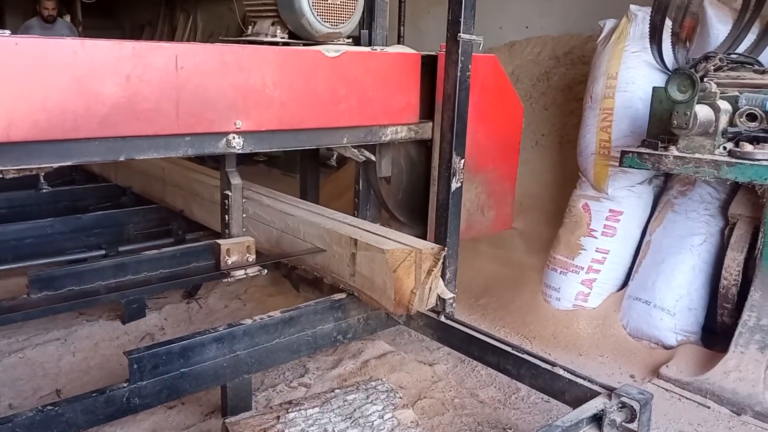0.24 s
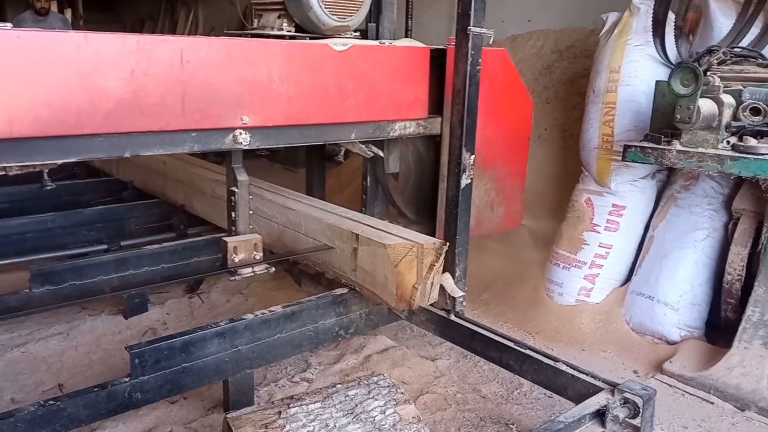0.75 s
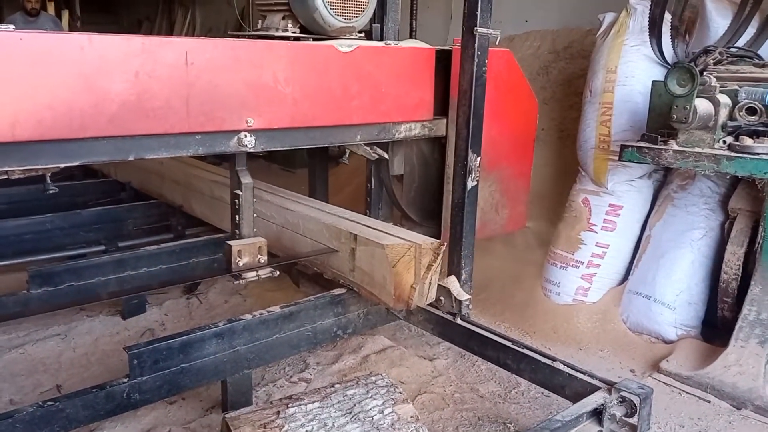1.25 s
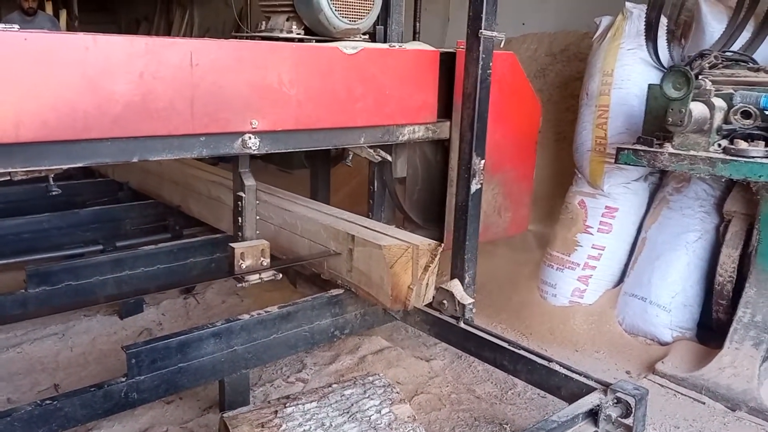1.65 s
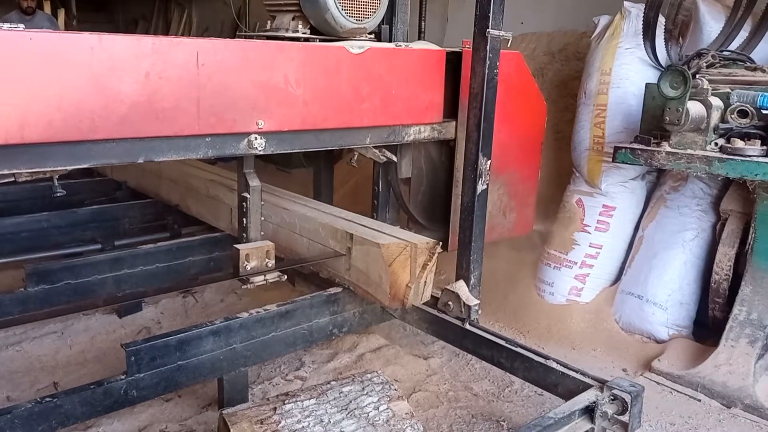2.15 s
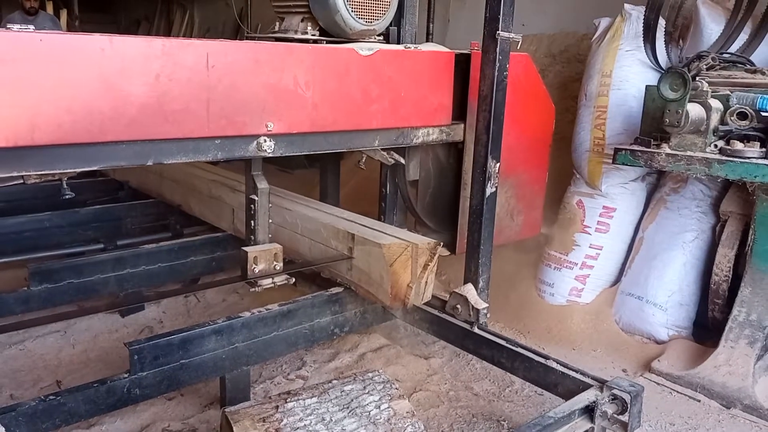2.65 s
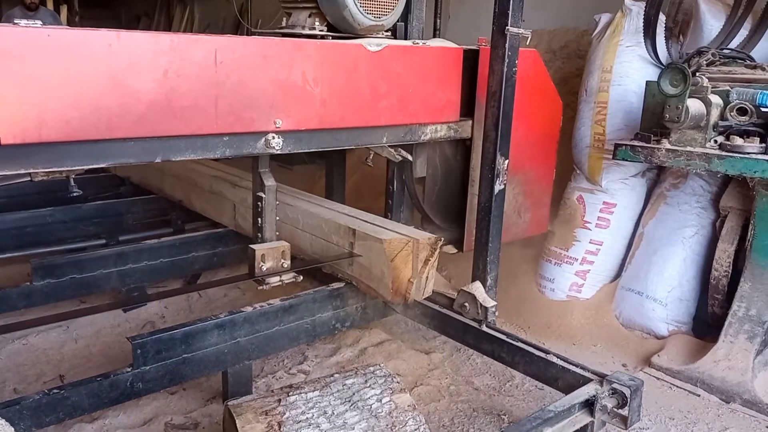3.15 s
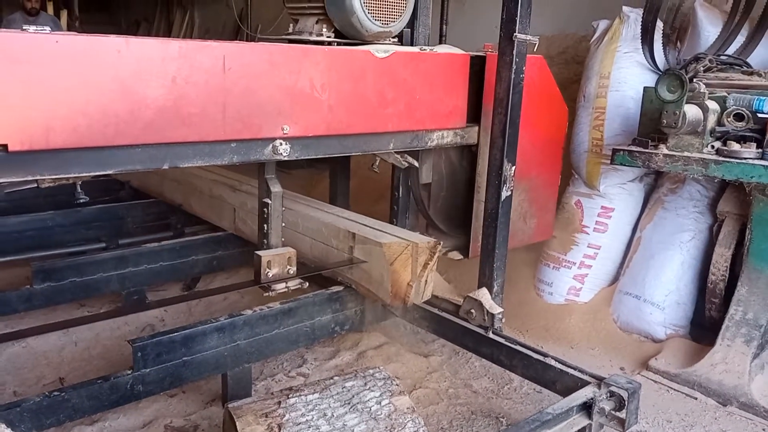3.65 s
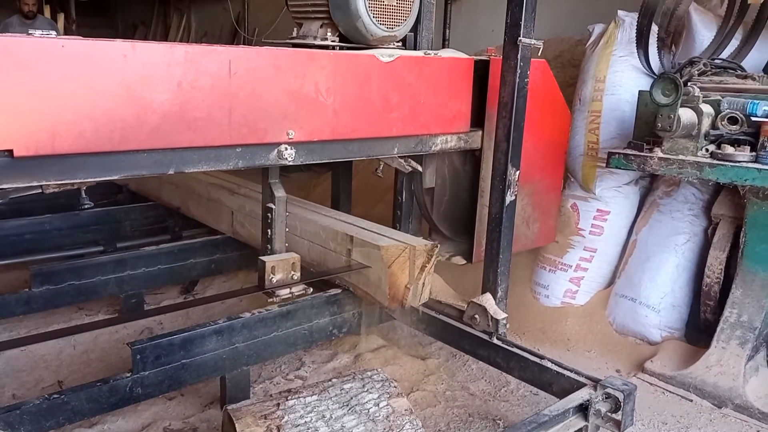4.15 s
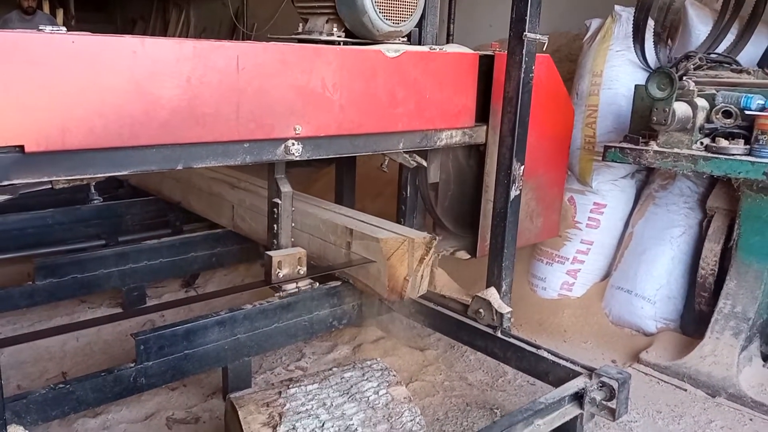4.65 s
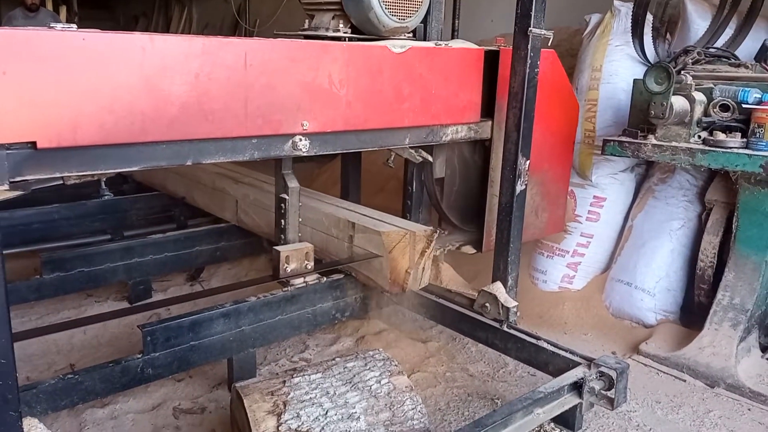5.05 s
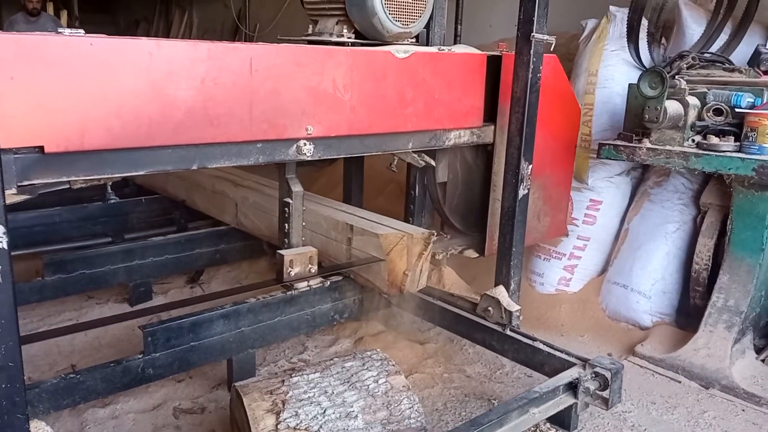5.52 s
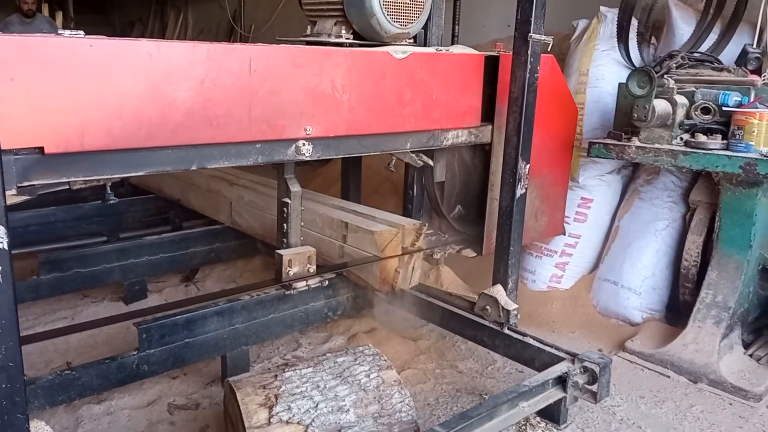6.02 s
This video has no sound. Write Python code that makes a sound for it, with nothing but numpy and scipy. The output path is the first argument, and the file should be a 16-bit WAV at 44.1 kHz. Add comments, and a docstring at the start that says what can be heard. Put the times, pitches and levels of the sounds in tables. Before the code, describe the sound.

Close by, a sawmill blade hisses and rasps steadily through timber, whining and briefly squealing over a low machine rumble.

```python
"""A workshop, close to a horizontal band saw running through an oak beam.
The teeth bite some 340 times a second: a buzzing hiss over the whine of the taut blade and the
beating hum of two drives. Each wheel turn shakes the frame, each lap of the band gently swells the
hiss, and now and then the blade squeals. Near the end the blade breaks out of the wood: the top of
the hiss fades, the band speeds up, rasp and rumble grow and the beam growls."""
import sys
import numpy as np
from scipy import signal
from scipy.fft import rfft, irfft, next_fast_len
from scipy.io import wavfile
from scipy.ndimage import uniform_filter1d

SR = 44100
rng = np.random.default_rng(int(sys.argv[2]) if len(sys.argv) > 2 else 0)


def int16_out(signal):
    """Quantize to a 16-bit WAV file."""
    q = np.round(np.clip(np.atleast_2d(signal).T, -1, 1) * 32767)
    wavfile.write(sys.argv[1], SR, q.astype(np.int16))


N = 276948
TIME_S = np.arange(N) / SR
END_NEAR_S, BREAKOUT_S = 5.35, 5.98   # the last stretch of wood begins; the teeth start to break out


def from_db(db):
    """Decibels to gain."""
    return 10 ** (np.asarray(db) / 20)


def rms_one(x):
    """Scale to unit power."""
    return x / np.sqrt(np.mean(np.abs(x) ** 2) + 1e-20)


def automation(rows):
    """One curve per column, drawn through the times in the first."""
    times, *columns = np.transpose(rows)
    return [np.interp(TIME_S, times, column) for column in columns]


def drift(rate_hz):
    """A smooth random wobble of spread 1: noise through a double low-pass."""
    hop, run_in = 40, 2000
    pole = np.exp(-2 * np.pi * hop * rate_hz / SR)
    noise = rng.standard_normal(N // hop + run_in + 2)
    slow = rms_one(signal.lfilter([1], [1, -2 * pole, pole * pole], noise)[run_in:])
    return np.interp(np.arange(N) / hop, np.arange(len(slow)), slow)


def ringing(width_hz):
    """Wandering level and phase of a vibration that is fed at random; unit power."""
    return np.sqrt(.5) * (drift(width_hz) + 1j * drift(width_hz))


def levelled(x, window_s):
    """Ride the gain to hold the power steady, leaving the fast beats."""
    return x / np.sqrt(uniform_filter1d(np.abs(x) ** 2, int(window_s * SR)) + 1e-9)


def equalised(x, eq):
    """Shape a sound with an EQ curve, silent beyond its ends; rms 1."""
    hz, db = np.transpose(eq)
    size = next_fast_len(N)
    bin_hz = np.maximum(np.arange(size // 2 + 1) * SR / size, 1)
    gain = from_db(np.interp(np.log(bin_hz), np.log(hz), db, left=-np.inf, right=-np.inf))
    return rms_one(irfft(rfft(x, size) * gain, size)[:N])


def swing(turns, peak_turns):
    """Rise and fall between -1 and 1, once a turn."""
    return np.cos(2 * np.pi * (turns - peak_turns))


def fader(cut_db, near_end_db, breakout_db_per_s):
    """Gain that holds through the cut, ramps over the last stretch of wood and slopes at breakout."""
    near_end = np.clip((TIME_S - END_NEAR_S) / (BREAKOUT_S - END_NEAR_S), 0, 1)
    since_breakout_s = np.maximum(TIME_S - BREAKOUT_S, 0)
    return from_db(cut_db + near_end_db * near_end + breakout_db_per_s * since_breakout_s)


# Speed of the band: time_s, tooth_rate_hz
BAND_SPEED = [(0.0, 339.6), (3.57, 339.6), (4.69, 340.9), (5.86, 340.6), (6.12, 349.5), (6.28, 352)]
CUTTING_RATE_HZ = BAND_SPEED[0][1]   # whistle, squeal and hum pitches are given at this speed

def band_travel():
    """The running band, as a count of the teeth that have passed."""
    tooth_hz, = automation(BAND_SPEED)
    return np.cumsum(tooth_hz) / SR


def tooth_buzz(teeth, blur_hz, base_blur_hz, tilt_db_per_octave):
    """Harmonics of the tooth rate; uneven teeth blur the higher ones more."""
    buzz = 0
    for k in range(1, 47):
        harmonic = np.exp(2j * np.pi * k * teeth) * ringing(np.hypot(base_blur_hz, blur_hz * k))
        buzz += from_db(tilt_db_per_octave * np.log2(k)) * harmonic.real
    return rms_one(buzz)


def tearing(buzz, eq, buzz_db, flutter_db, flutter_hz):
    """Regular bites plus fibres that tear at random, fluttering with the grain of the wood."""
    force = rng.standard_normal(N) + from_db(buzz_db) * buzz
    return equalised(force, eq) * from_db(flutter_db * drift(flutter_hz))


# Woody body of the beam: freq_hz, gain_db
BEAM_EQ = [(250, -65), (380, -8), (460, 2.5), (530, -1), (610, 5), (680, 5.5), (740, 4), (860, 3.5),
           (980, 3.5), (1150, -3.5), (1400, 3), (2200, -32)]

def beam_drone(buzz):
    """The bites shake the beam into a midrange drone."""
    drone = tearing(buzz, BEAM_EQ, buzz_db=-9, flutter_db=.72, flutter_hz=9.2)
    return fader(-36, near_end_db=.5, breakout_db_per_s=1) * drone


# Coarse upper mids of torn fibres: freq_hz, gain_db
RASP_EQ = [(900, -24), (1180, -3.5), (1300, 0), (1690, 0), (1850, -1), (2080, -1.5), (2300, -5), (2600, -8),
           (3200, -7), (3430, -3.5), (3850, -1), (4300, -4), (4650, -13), (6000, -37)]

def fibre_rasp(buzz):
    """The teeth rasp the fibres, louder as the last of the wood rings more freely."""
    rasp = tearing(buzz, RASP_EQ, buzz_db=-7, flutter_db=.26, flutter_hz=9)
    return fader(-29, near_end_db=3, breakout_db_per_s=7.6) * rasp


# Airy top of the flying chips: freq_hz, gain_db
CHIP_EQ = [(9000, -17), (10700, -9), (11100, -2), (11800, -5), (12550, -2.5), (12930, -2), (13080, -11),
           (13800, -14), (14300, -4.5), (15000, -4), (15300, -1), (15680, -1), (15850, -14)]

def chip_spray(buzz, air_db):
    """The bites throw off chips; a shelf lifts their highest treble by air_db."""
    spray = tearing(buzz, CHIP_EQ, buzz_db=-4, flutter_db=.7, flutter_hz=45)
    spray *= fader(-33.5, near_end_db=-1.5, breakout_db_per_s=-44)
    air = signal.sosfiltfilt(signal.butter(2, 15300, "high", fs=SR, output="sos"), spray)
    return spray + (from_db(air_db) - 1) * air


# Bright band of steel on wood: freq_hz, gain_db
SCRAPE_EQ = [(3500, -49), (4300, -9), (4700, -2), (5000, -2.5), (6300, -1.5), (6720, 2), (7000, -0.5),
             (7450, 0.5), (7900, -5.5), (8500, -8), (11000, -55)]

def kerf_scrape(buzz):
    """The steel scrapes in the kerf."""
    scrape = tearing(buzz, SCRAPE_EQ, buzz_db=-7, flutter_db=.48, flutter_hz=18)
    return fader(-30, near_end_db=2.7, breakout_db_per_s=-13) * scrape


def whistle(teeth, pitch_hz, blur_hz=.61, window_s=.18):
    """A thin, wavering tone that follows the band speed; blur_hz is per multiple of the tooth rate."""
    multiple = pitch_hz / CUTTING_RATE_HZ
    waver = levelled(ringing(blur_hz * multiple), window_s)
    return np.sqrt(2) * (waver * np.exp(2j * np.pi * multiple * teeth)).real


# Fine treble of the tooth tips: freq_hz, gain_db
SIZZLE_EQ = [(7000, -55), (7900, -7), (8150, -8.5), (8600, 1.5), (8900, 3.5), (9250, 2), (9700, -1.5),
             (10200, -1), (10600, -10), (11000, -8.5), (13000, -40)]
# Whistles of the tooth tips: pitch_hz, relative_db
TIP_TONES = [(8830, -11), (9169, -11), (10188, -17)]

def tip_sizzle(teeth, buzz, whistle_db):
    """The tooth tips sizzle and whistle, dying quickly once they break out."""
    sizzle = tearing(buzz, SIZZLE_EQ, buzz_db=-9, flutter_db=.95, flutter_hz=45)
    sizzle += from_db(whistle_db) * sum(from_db(db) * whistle(teeth, hz) for hz, db in TIP_TONES)
    return fader(-34.5, near_end_db=1.6, breakout_db_per_s=-38) * sizzle


# Slow shifts in the colour of the hiss: time_s, scrape_db, sizzle_db, air_db
HISS_RIDES = [(0, 1, -0.5, 0), (.85, 0, -0.5, 4), (1.7, 0.7, 0.5, 1), (2.4, -0.7, 0.5, 0),
              (3.25, -0.2, 0.5, 1), (4.05, -0.2, 2.5, 2), (4.8, 0.5, 2.5, 6), (5.4, 0.2, 2.3, 7.5),
              (6.0, 0, 1.8, 3)]

def cutting_hiss(teeth, buzz, teeth_per_lap=102):
    """Hard and soft grain, and the lap of the band, move all four layers of hiss together."""
    scrape_db, sizzle_db, air_db = automation(HISS_RIDES)
    grain_db = .61 * drift(rate_hz=35)
    lap_db = .22 * swing(teeth / teeth_per_lap, peak_turns=.14)
    hiss = fibre_rasp(buzz) + chip_spray(buzz, air_db)
    hiss += from_db(scrape_db) * kerf_scrape(buzz)
    hiss += from_db(sizzle_db) * tip_sizzle(teeth, buzz, whistle_db=sizzle_db)
    return from_db(grain_db + lap_db) * hiss


# Bending modes of the blade's free span: pitch_hz, width_hz, relative_db
BLADE_MODES = [(1255.4, 6.9, -0.7), (1273, 4.4, -5), (1291, 4.6, -2.5), (1334, 16, 0.4), (1395, 3, -8),
               (1449, 17, -8.5), (1594, 13, -9)]
# How hard the blade whines: time_s, level_db
WHINE_RIDE = [(0, -31), (.55, -32.5), (.8, -35), (1.45, -33.5), (1.65, -32), (2.1, -30.7), (2.35, -30.5),
              (2.7, -31), (2.85, -29.5), (3.45, -29), (3.7, -34), (4.08, -29.7), (4.35, -33), (4.95, -31.7),
              (5.4, -35), (5.7, -33.5), (6.22, -29.5)]

def blade_whine():
    """The cut keeps close bending modes ringing; they beat against one another."""
    whine_db, = automation(WHINE_RIDE)
    waver_db = 1.5 * drift(rate_hz=4.7)
    modes = 0
    for hz, width_hz, db in BLADE_MODES:
        modes += from_db(db) * (ringing(width_hz) * np.exp(2j * np.pi * hz * TIME_S)).real
    return from_db(whine_db + waver_db) * levelled(modes, window_s=.064)


# Thin, steady tones of the blade: pitch_hz, level_db
BLADE_TONES = [(1353, -38), (2716, -46), (3056, -53.5), (3733, -51.5), (4073, -48), (4752, -53),
               (6111, -54), (7130, -51), (7469, -46), (8487, -45.5)]

def blade_whistles(teeth):
    """Blade modes near tooth harmonics whistle throughout."""
    return sum(from_db(db) * whistle(teeth, hz) for hz, db in BLADE_TONES)


# Squeals of the blade: start_s, end_s, pitch_hz, level_db
SQUEAL_CUES = [(0, .55, 1443, -37), (0.027, .4, 1354, -36), (0.125, 0.326, 2716, -35.5),
               (.55, 1.0, 7131, -38), (.71, .9, 2716, -37), (.72, 0.998, 4075, -39), (.97, 1.15, 3735, -42),
               (1.577, 1.763, 1354, -26.5), (1.9, 2.05, 2716, -41), (1.943, 2.896, 1354, -35),
               (2.247, 2.85, 1293, -34), (2.64, 2.78, 3735, -37), (3.623, 3.92, 2716, -44),
               (3.85, 4.25, 1354, -34), (4.05, 4.24, 8489, -42), (4.3, 5.1, 1380, -36.5),
               (4.68, 4.876, 4075, -34), (5.05, 5.8, 4754, -46), (5.4, 5.95, 10188, -40),
               (5.864, 6.033, 8830, -31.5), (5.87, 6.16, 2716, -41), (5.958, 6.184, 1354, -31.5)]

def blade_squeals(teeth, fade_s=.07):
    """One mode at a cue catches and squeals: it swells, holds and fades."""
    squeals = 0
    for start_s, end_s, hz, db in SQUEAL_CUES:
        inside_s = np.minimum(TIME_S - start_s, end_s - TIME_S)
        swell = np.clip(inside_s / fade_s + .5, 0, 1)
        squeals += from_db(db) * swell * whistle(teeth, hz, blur_hz=.5, window_s=.03)
    return squeals


# Low weight of the saw frame: freq_hz, gain_db
FRAME_EQ = [(20, -28), (35, -27), (50, -22), (70, -12.5), (115, -9.5), (145, 3), (175, 2), (188, -2.5),
            (203, 3.5), (250, -2.5), (300, 1), (370, -3.5), (480, -2), (900, -31)]

def frame_rumble(teeth, teeth_per_turn=34, shake_db=1.0):
    """The wheels shake the frame once a turn; the rumble grows at breakout."""
    shake = from_db(shake_db * swing(teeth / teeth_per_turn, peak_turns=.68))
    rumble = equalised(rng.standard_normal(N), FRAME_EQ)
    return fader(-44.9, near_end_db=-.3, breakout_db_per_s=9.2) * shake * rumble


# Two drives at nearly the same pitch: pitch_hz, relative_db
DRIVE_TONES = [(79.6, -59), (80.155, -62.5)]

def drive_hum(teeth, trim_db=-2.7, waver_db=1.2):
    """Two low tones follow the speed of the band; they start opposed and beat slowly."""
    run_s = teeth / CUTTING_RATE_HZ
    hum = 0
    for polarity, (hz, db) in zip((1, -1), DRIVE_TONES):
        hum += polarity * from_db(db) * np.sqrt(2) * np.sin(2 * np.pi * hz * run_s)
    return from_db(trim_db + waver_db * drift(rate_hz=6)) * hum


# Low, rough voice of the freed beam: freq_hz, gain_db
GROWL_EQ = [(120, -14), (170, -9), (240, 0), (290, 1), (380, -11), (800, -15)]

def beam_growl(delay_s=.144, attack_s=.035, level_db=-35.5):
    """The beam, no longer held by the teeth, growls just after they break out."""
    attack = np.clip((TIME_S - BREAKOUT_S - delay_s) / attack_s, 0, 1)
    return from_db(level_db) * attack * equalised(rng.standard_normal(N), GROWL_EQ)


# Slow shifts in the low end: time_s, rumble_db, drone_db
LOW_END_RIDES = [(0, 0, -0.5), (.75, 1.7, 0.5), (1.2, 0.6, 2), (1.6, 0.5, 0.2), (2.2, 0, 0.4),
                 (2.7, -1.2, 0), (3.3, 1.5, -0.2), (3.75, -0.6, 0), (4.2, 0.5, -0.5), (5.2, 0.5, 0.1),
                 (6.0, 1.5, -0.4)]

def scene():
    """Wood, blade and machine, mixed to the centre."""
    rumble_db, drone_db = automation(LOW_END_RIDES)
    teeth = band_travel()
    buzz = tooth_buzz(teeth, blur_hz=1.0, base_blur_hz=9.1, tilt_db_per_octave=1.4)
    cut = from_db(drone_db) * beam_drone(buzz) + cutting_hiss(teeth, buzz)
    blade = blade_whine() + blade_whistles(teeth) + blade_squeals(teeth)
    machine = from_db(rumble_db) * frame_rumble(teeth) + drive_hum(teeth)
    return np.tile(cut + blade + machine + beam_growl(), (2, 1))


def record(dry):
    """A steep low-pass takes off the very top."""
    cutoff_hz = 15780
    return signal.sosfilt(signal.ellip(12, .1, 90, cutoff_hz, fs=SR, output="sos"), dry)


dry = scene()
out = record(dry)
int16_out(out)
```